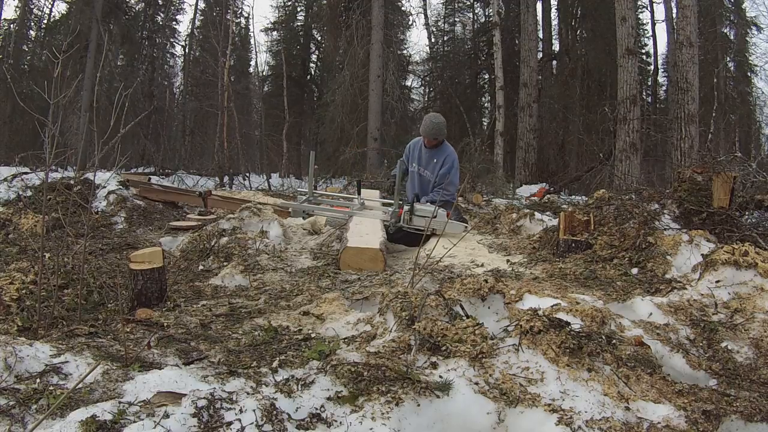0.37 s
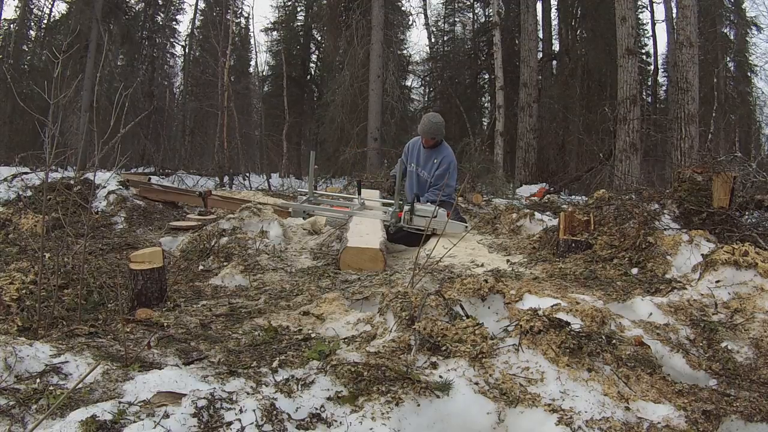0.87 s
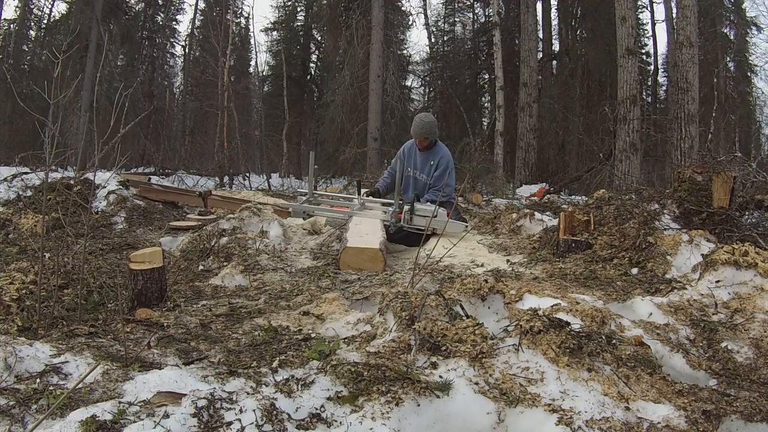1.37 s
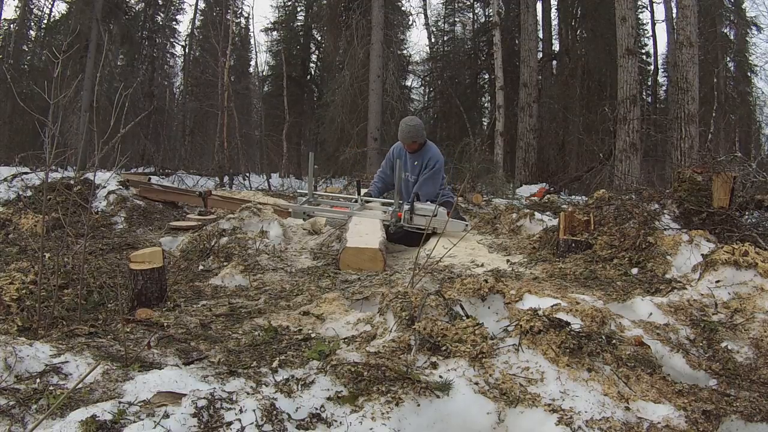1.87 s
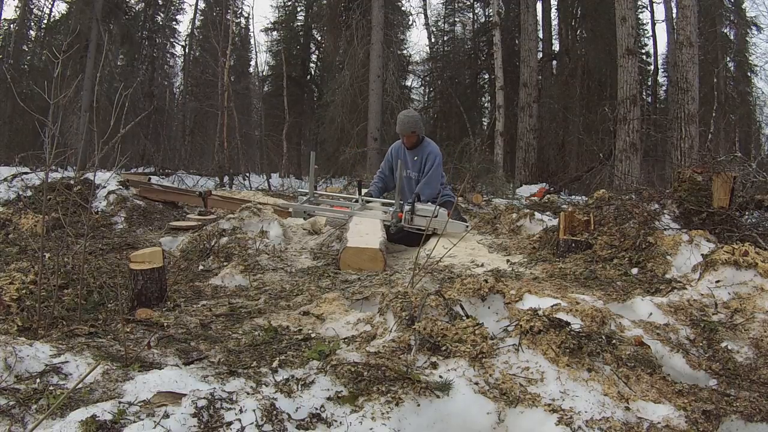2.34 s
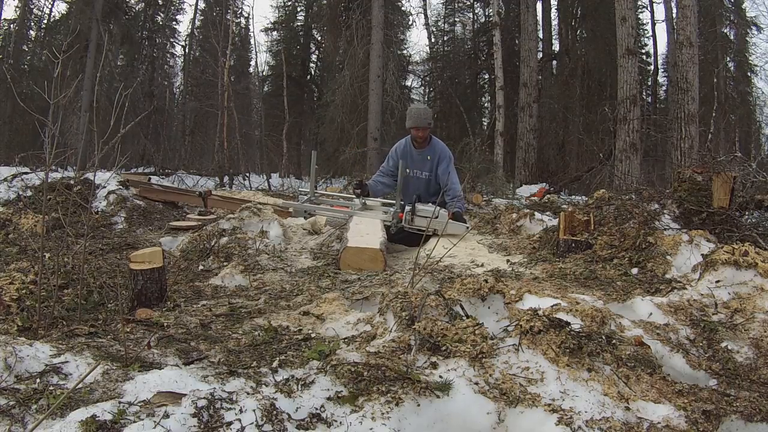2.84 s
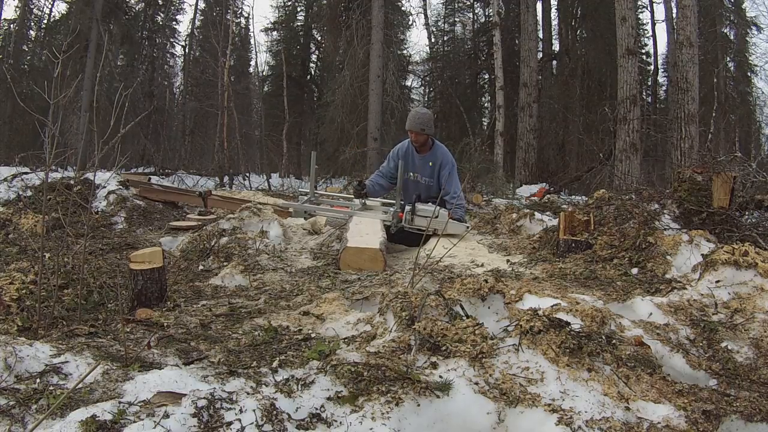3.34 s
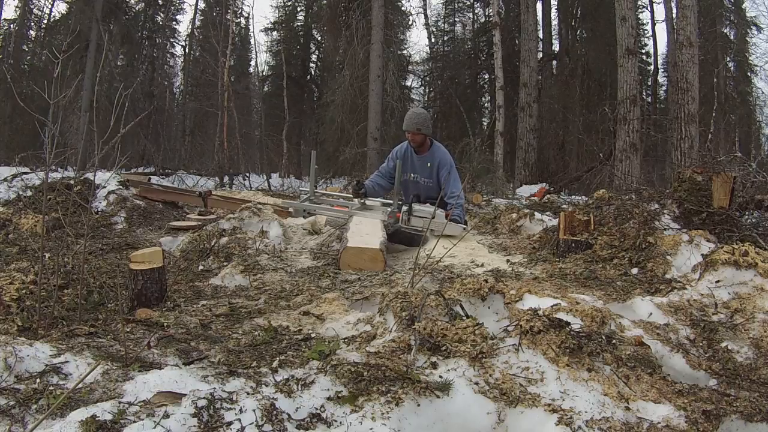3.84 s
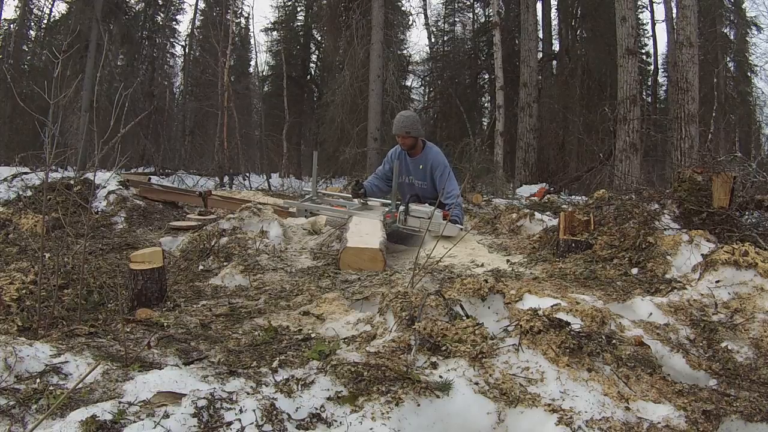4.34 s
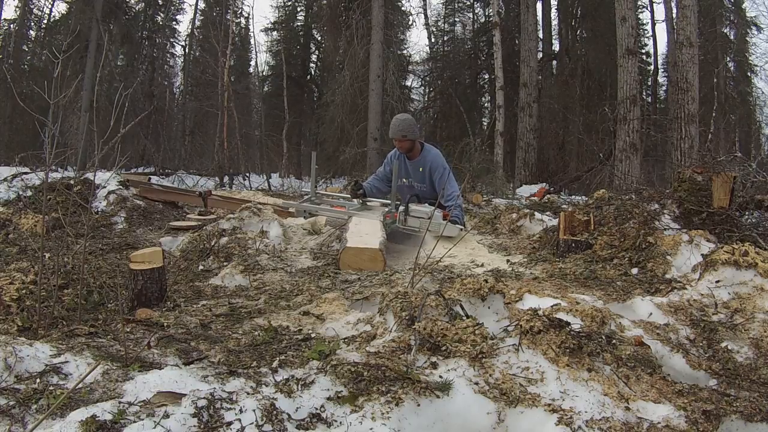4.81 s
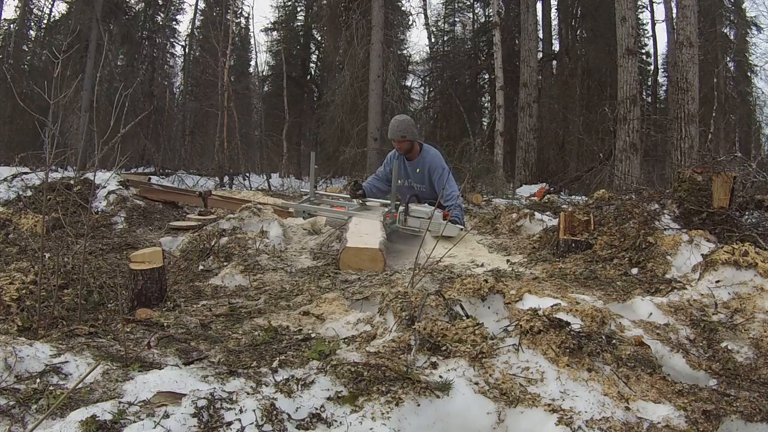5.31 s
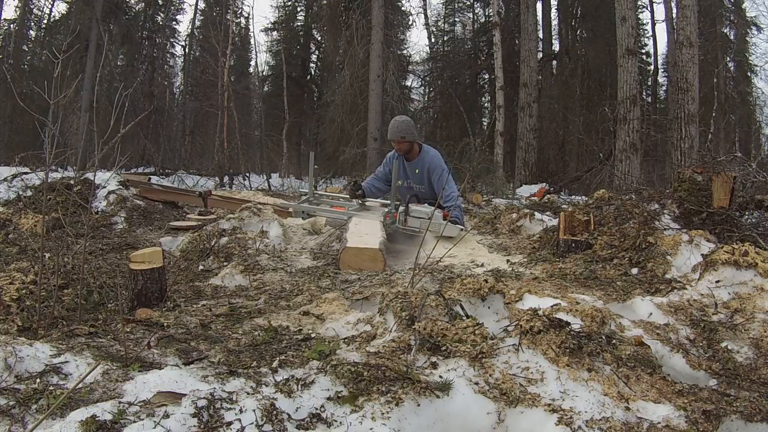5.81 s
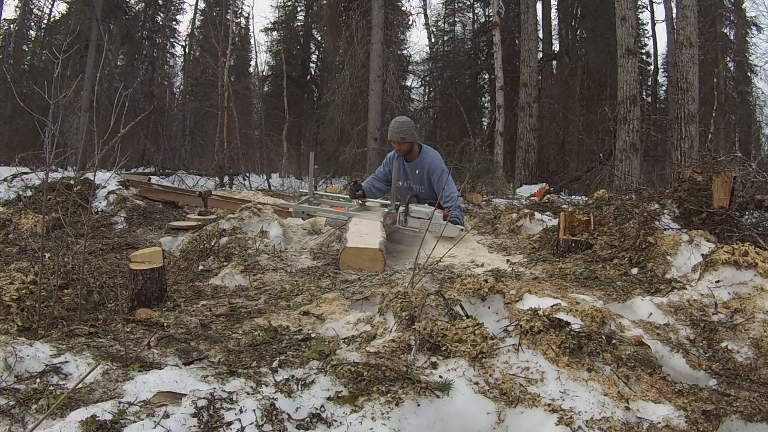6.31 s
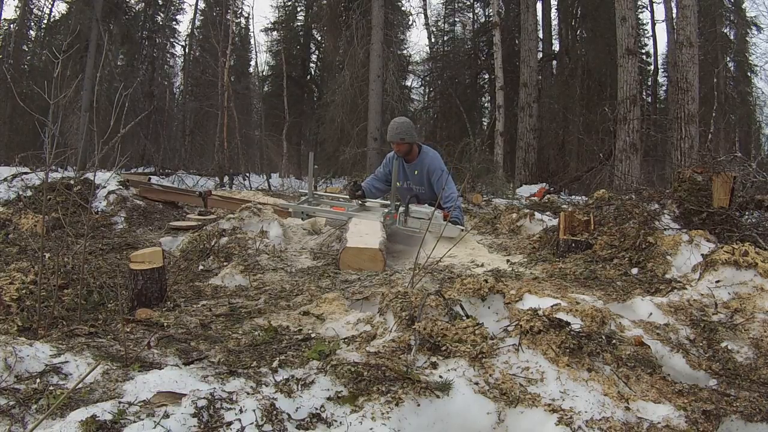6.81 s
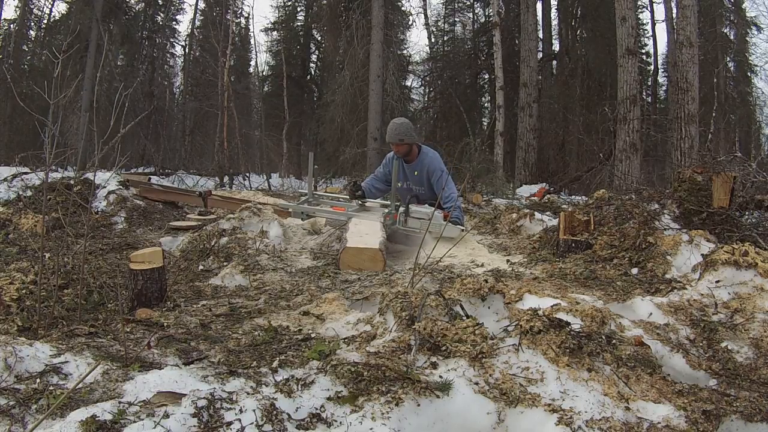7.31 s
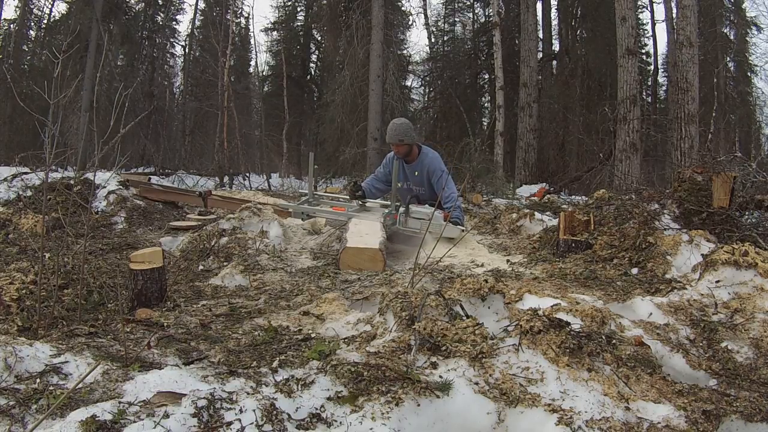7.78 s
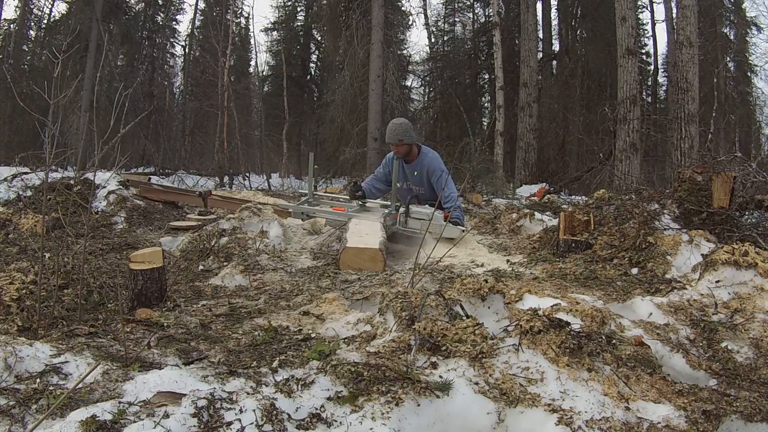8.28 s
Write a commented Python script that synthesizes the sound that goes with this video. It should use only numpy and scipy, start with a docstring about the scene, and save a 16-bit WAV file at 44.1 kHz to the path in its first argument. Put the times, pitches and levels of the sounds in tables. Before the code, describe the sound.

Rough two-stroke chainsaw idle, sputtering and clattering, suddenly throttles up to a harsh buzzing roar cutting wood, pitch slowly dropping under load.

```python
"""A two-stroke chainsaw on a milling frame idles unevenly: a noise crack and puff at each firing, clatter between.
Then it revs up and rips along a log, bogging in the cut: sine orders of the crank, with pulsing roar and hiss.
Place: a snowy wood with dull echoes. Distance: some metres off.
Microphone: in a closed camera housing that thins the middle and rings between 2 and 6 kHz (one filter);
low shaking booms near 60 Hz as noise through slow resonances, over steady still-air and microphone noise."""
import sys
import numpy as np
from scipy import signal
from scipy.fft import rfft, irfft, next_fast_len
from scipy.io import wavfile
from scipy.ndimage import uniform_filter1d

SR = 44100
rng = np.random.default_rng(int(sys.argv[2]) if len(sys.argv) > 2 else 0)


def attenuation_scalar(level_db):
    """Turn a level in dB into a linear amplitude multiplier (20 dB per decade)."""
    decades = np.asarray(level_db, float) / 20
    return 10 ** decades


def persist_wave(psi):
    """Save psi, clipped to +-1, as 16-bit WAV."""
    counts = np.round(np.clip(psi, -1, 1) * 32767).astype(np.int16)
    wavfile.write(sys.argv[1], SR, np.atleast_2d(counts).T)


N = 381906

# Idle firings, the charge lights only every few turns; level ahead of wood and housing: start_s, level_db
FIRINGS = [(0.0327, -26), (0.1124, -22.5), (0.194, -26), (0.2798, -25), (0.3337, -28.5), (0.38, -26.5),
           (0.4658, -24), (0.528, -25.5), (0.613, -24), (0.6677, -28), (0.732, -32), (0.804, -27),
           (0.9094, -26), (0.9705, -28), (1.057, -29), (1.119, -32), (1.2126, -30), (1.277, -28.5),
           (1.368, -27), (1.4283, -29.5), (1.501, -26.5), (1.5671, -24.5), (1.6807, -23), (1.7662, -24),
           (1.825, -26), (1.864, -31), (1.9073, -32), (1.9335, -22), (2.018, -28.5), (2.0822, -26),
           (2.141, -32.5), (2.235, -31), (2.3135, -25.5), (2.3973, -29), (2.5002, -26), (2.589, -25),
           (2.673, -22.5), (2.756, -22.5), (2.8503, -30), (2.959, -26), (3.0422, -23.5), (3.1219, -24.5),
           (3.245, -23.5), (3.3462, -23.5), (3.424, -22), (3.516, -25), (3.544, -20)]
# Clatter of an unfired turn and its thin ting, before turn-to-turn changes: time_s, clatter_db, ting_db
UNFIRED = [(0, -34.5, -36.5), (.75, -30.5, -31.5), (1.0, -31, -45), (2.1, -33, -40), (2.4, -36, -44),
           (2.7, -30, -37), (3.3, -30.5, -38), (3.5, -27, -33)]
# Low hum of the idle, order of the turn rate: order, level_db
IDLE_ORDERS = [(1, -50.5), (2, -66.5), (4, -67)]
# Parts of the casing that a noise puff reaches: low_hz, high_hz
CASING_BANDS = [(1200, 2200), (2200, 3300), (3300, 4500), (4500, 6500), (6500, 9000)]
# Slow modes of the housing, width of one resonance, levels against each other: pitch_hz, width_hz, level_db
BOOM_MODES = [(50.8, 10, -25), (63.85, 5.2, 0), (80.3, 10.7, -0.5)]
# Gusts of low shaking on the housing, level before the boom's band-pass: centre_s, level_db, length_s
GUSTS = [(.1, -48, 0.19), (.4, -48, 0.17), (.62, -49, 0.13), (1.862, -34.5, 0.055), (1.962, -35, 0.032),
         (2.277, -47, 0.087), (2.806, -50, 0.061), (3.45, -38.5, .15), (3.616, -38, 0.15),
         (3.868, -43, 0.11), (4.046, -38.5, 0.11), (4.473, -44, 0.075), (4.95, -42, 0.12), (5.2, -39, 0.28),
         (5.512, -39, .13), (5.835, -41, 0.33), (6.3, -36, 0.12), (6.476, -34, 0.093), (6.628, -32, 0.099),
         (6.872, -28, 0.22), (7.35, -41.5, 0.33), (7.516, -33.5, 0.13), (7.7, -33, .1), (7.82, -33, 0.095),
         (8.046, -41, 0.24), (8.263, -30.5, 0.16), (8.54, -35, .3)]
# Colour of still air and microphone noise, relative density: pitch_hz, level_db_per_hz
MIC_NOISE = [(20, -7), (50, -27), (100, -3), (200, -6.5), (330, -6), (500, -12.5), (780, -13), (1040, -19),
             (2000, -16), (6000, -37), (12000, -30), (14000, -32), (15500, -22)]
# Echoes from ground and trunks: delay_s, level_db
ECHOES = [(.011, -22.5), (.037, -14), (.083, -24.5), (0.138, -16)]
# Broad trend of what passes the housing: pitch_hz, gain_db
HOUSING = [(60, -28), (200, -45.5), (700, -21), (1100, -21), (1700, -16.5), (2400, -5), (3200, -1),
           (4200, -1.5), (5300, -4.5), (6500, -11), (9000, -11), (11200, -10), (13200, -14), (15200, -23.5)]
# Narrow peaks and notches of the housing, added to the trend: pitch_hz, width_hz, gain_db
HOUSING_MODES = [(1000, 102, -10), (1179, 70, -15.5), (1696, 120, 10), (1853, 17, -4.5), (2072, 170, -16.5),
                 (2183, 126, 6), (2403, 61, 9), (2915, 94, 6.5), (3054, 180, 2.5), (3564, 42, 8),
                 (3510, 57, 5), (3640, 76, -6.5), (4140, 120, 4), (4730, 43, 2), (5330, 930, 5),
                 (2685, 90, -8), (4460, 115, -22), (4915, 110, -20), (5680, 200, -4), (7630, 1100, 1),
                 (8460, 340, 5), (9290, 990, -4.5), (11660, 270, -18.5), (12260, 390, -16)]
# Crank speed under throttle: time_s, speed_turns_per_s
THROTTLE = [(3.5, 54.9), (3.57, 74.8), (3.61, 83.1), (3.66, 79.9), (3.73, 103.0), (3.8, 121.4),
            (3.84, 129.3), (4.04, 140.5), (4.26, 187.1), (4.36, 197.9), (4.45, 194.7), (4.62, 179.8),
            (4.83, 179.0), (5.03, 183.6), (5.89, 168.8), (6.15, 158.6), (6.76, 149.8), (6.9, 141.9),
            (7.06, 132.8), (7.26, 129.7), (7.51, 138.4), (7.67, 137.4), (8.03, 127.8), (8.51, 126.2),
            (8.66, 131.7)]
# Intake growl as the throttle opens, before the airbox resonance: time_s, level_db
GROWL = [(3.5, -53), (3.56, -59), (3.68, -59.5), (3.76, -54), (3.82, -83), (3.9, -105)]
# Orders of the turn rate in the growl: order
GROWL_ORDERS = [7, 8, 9, 10, 11]
# Exhaust tones before speed and resonances act, and where exhaust and intake cancel:
# order, level_db, dip_hz, dip_width_hz, dip_db
EXHAUST = [(1, -45.5, 138, 6.7, -17), (2, -50, 279, 15, -4), (3, -55.5, 623, 87, -29),
           (4, -54, 480, 110, -13.5), (5, -62, 725, 136, -15), (6, -54, 1030, 290, -24)]
# Exhaust orders that keep their strength at low speed: order
HELD_ORDERS = [3, 5]
# Load of the cut, ahead of wood and housing: time_s, roar_db, whine_db, hiss_db
LOAD = [(3.53, -29.5, -36, -34), (3.6, -31, -41, -36), (3.76, -22, -30, -22.5), (3.89, -19.5, -27, -18),
        (4.13, -21.5, -22.5, -26), (4.33, -19.5, -18.5, -18.5), (4.71, -19.5, -20.5, -21.5),
        (5.13, -20.5, -20, -20), (5.62, -20.5, -19, -23.5), (5.92, -21, -22, -22), (6.2, -21, -23.5, -22),
        (6.7, -22, -23, -22.5), (7.1, -20.5, -25, -22), (7.49, -20.5, -25, -21.5),
        (7.84, -20.5, -23.5, -21.5), (8.15, -22, -26, -18.5), (8.66, -19.5, -26.5, -24)]
# Wavering exhaust and fan whine, levels against each other: order, level_db
WHINE = [(7, 0), (9, 0.5), (10, -1), (11, -1.5), (13, -0.5), (15, 4.5), (16, 3), (18, 2), (20, 2.5),
         (22, 2.5), (23, 1), (24, -6), (25, 0), (28, 2)]
# Steadier chain and fan orders against the whine level, and where each sings out or fades:
# order, level_db, peak_hz, peak_width_hz, peak_db
FAN = [(8, -15, 1284, 84, 11), (12, -10.5, 1870, 470, -16), (14, -15.5, 2425, 46, 5.5),
       (17, -9, 2984, 190, 3.5), (19, -16, 3460, 49, 9.5), (21, -23, 3270, 330, 13.5)]

CRUISE_TURNS_PER_S = 160
AIRBOX_HZ, AIRBOX_WIDTH_HZ = 720, 280


def rms_one(x):
    """Scale to rms 1."""
    return x / np.sqrt(np.mean(x ** 2) + 1e-20)


def noise():
    """White noise for the whole scene."""
    return rng.standard_normal(N)


def in_time(rows):
    """Columns of a table at every sample."""
    s, *columns = np.transpose(rows)
    return [np.interp(np.arange(N) / SR, s, column) for column in columns]


def drift(rate_hz):
    """Slow chance of spread 1: noise through two equal low-pass poles, run at every 40th sample."""
    r = np.exp(-80 * np.pi * rate_hz / SR)
    slow = signal.lfilter([1], [1, -2 * r, r * r], rng.standard_normal(N // 40 + 2002))[2000:]
    return np.interp(np.arange(N) / 40, np.arange(len(slow)), rms_one(slow))


def hump(hz, mode_hz, width_hz):
    """Shape of a resonance, 1 on top."""
    return 1 / (1 + (2 * (hz - mode_hz) / width_hz) ** 2)


def colour(x, trend, modes=()):
    """Causal (minimum-phase) filter with the given trend, peaks and notches."""
    size = next_fast_len(N + SR // 4, True)
    hz = np.maximum(np.arange(size // 2 + 1) * SR / size, 1)
    trend_hz, trend_db = np.transpose(trend)
    db = np.interp(np.log(hz), np.log(trend_hz), trend_db)
    for mode_hz, width_hz, mode_db in modes:
        db = db + mode_db * hump(hz, mode_hz, width_hz)
    # folding the cepstrum forward in time makes the phase minimal
    cepstrum = irfft(db * np.log(10) / 20, size)
    cepstrum[1:size // 2] *= 2
    cepstrum[size // 2 + 1:] = 0
    return irfft(rfft(x, size) * np.exp(rfft(cepstrum)), size)[:N]


def band(x, low_hz, high_hz):
    """Band-pass."""
    return signal.sosfilt(signal.butter(2, [low_hz, high_hz], "band", fs=SR, output="sos"), x)


def dulled(x, corner_hz):
    """Gentle first-order low-pass."""
    return signal.sosfilt(signal.butter(1, corner_hz, fs=SR, output="sos"), x)


def bursts(at_s, db, rise_s, fall_s):
    """Envelope of puffs, each of peak height given in dB."""
    marks = np.full(N, 1e-18)
    places = np.clip(np.round(at_s * SR).astype(int), 0, N - 1)
    np.add.at(marks, places, attenuation_scalar(db))
    t = np.arange(SR // 20) / SR
    shape = (1 - np.exp(-t / rise_s)) * np.exp(-t / fall_s)
    return signal.oaconvolve(marks, shape / shape.max())[:N]


def ticks(at_s, db, tilt_db, spread_db, rise_s, fall_s):
    """Noise puffs that reach each part of the casing with a strength of their own."""
    strengths_db = spread_db * rng.standard_normal((len(at_s), len(CASING_BANDS)))
    white = [noise(), noise()]   # neighbouring parts get unrelated noise
    out = 0
    for k, (low_hz, high_hz) in enumerate(CASING_BANDS):
        envelope = bursts(at_s, db + tilt_db * k + strengths_db[:, k], rise_s, fall_s)
        out = out + envelope * band(white[k % 2], low_hz, high_hz)
    return out


def firings():
    """Each firing gives a sharp crack, a treble snap and the slower blowdown of the exhaust."""
    fired, fired_db = np.transpose(FIRINGS)
    snap_db = fired_db - 8.5 + 2.0 * rng.standard_normal(len(fired))
    crack = bursts(fired - .0008, fired_db + 2.5, .0004, .0018) * band(noise(), 3400, 6300)
    snap = bursts(fired - .001, snap_db, 0.00089, 0.0024) * band(noise(), 8600, 19000)
    blowdown = ticks(fired - .007, fired_db - 10.0, tilt_db=0.073, spread_db=1.0,
                     rise_s=0.008, fall_s=0.0096)
    return crack + snap + blowdown


def idle_turns():
    """Times of the unfired turns and their place after the firing: the crank coasts, each turn slower."""
    turns_per_s = 48.0   # sets how many whole turns fit between firings
    fired = np.transpose(FIRINGS)[0]
    edges = np.r_[fired[0] - .083, fired]
    turns, places = [], []
    for start, end in zip(edges, edges[1:]):
        count = max(round((end - start) * turns_per_s), 1)
        turns += list(start + (end - start) * (np.arange(1, count) / count) ** 1.091)
        places += list(range(1, count))
    return np.array(turns), np.array(places)


def unfired_turns():
    """Each unfired turn clatters softly with a thin ting, weaker the longer the crank coasts."""
    turns, places = idle_turns()
    s, clatter_db, ting_db = np.transpose(UNFIRED)
    uneven_db = 1.5 * rng.standard_normal(len(turns)) - 0.37 * places
    clatter = ticks(turns - .004, np.interp(turns, s, clatter_db) + uneven_db, tilt_db=-1.3,
                    spread_db=1.8, rise_s=0.00086, fall_s=0.0049)
    ting = bursts(turns - .003, np.interp(turns, s, ting_db) + uneven_db, 0.00067, 0.0064)
    return clatter + ting * band(noise(), 8050, 10360)


def idling():
    """The idle gives way to the open throttle."""
    return np.interp(np.arange(N) / SR, [3.5, 3.62], [1, 0])


def rattle():
    """Steady faint band of noise under the idle."""
    return attenuation_scalar(-45.5) * idling() * band(noise(), 1600, 5500)


def idle_hum():
    """Each turn, fired or not, pumps the crankcase: a low hum on the mean turn rate."""
    every = np.sort(np.r_[idle_turns()[0], np.transpose(FIRINGS)[0]])
    every = np.r_[every[0] - .2, every, every[-1] + .2]
    counted = np.r_[-10, np.arange(len(every) - 2), len(every) + 10]
    turned = np.interp(np.arange(N) / SR, every, counted)
    angle = 2 * np.pi * uniform_filter1d(turned, size=7000, mode="nearest")
    hum = sum(attenuation_scalar(db + order * 0.6 * drift(1.5)) * np.sin(order * angle) for order, db in IDLE_ORDERS)
    return idling() * hum


def gust_strength():
    """Powers of the gusts add up over a faint lull, which rises a little as the cut begins."""
    t = np.arange(0, N + 200, 200) / SR
    power = attenuation_scalar(2 * np.interp(t, [3.4, 3.6], [-51, -48.5]))
    for s, db, length_s in GUSTS:
        power = power + attenuation_scalar(2 * db) * np.exp(-(2 * (t - s) / length_s) ** 2)
    return np.interp(np.arange(N) / SR, t, np.sqrt(power))


def boom():
    """Low shaking sets the housing's slowest modes going at random; a double resonance keeps them narrow."""
    rung = 0
    for hz, width_hz, db in BOOM_MODES:
        r = np.exp(-np.pi * width_hz / SR)
        poles = [1, -2 * r * np.cos(2 * np.pi * hz / SR), r * r]
        once = signal.lfilter([1, 0, -1], poles, rng.standard_normal(N + SR))
        twice = signal.lfilter([1], poles, once)[SR:]   # the first second lets the mode build up
        rung = rung + attenuation_scalar(db) * rms_one(twice)
    rung = rms_one(rung)
    swell = np.sqrt(uniform_filter1d(rung ** 2, size=3500) + 1e-12)
    evened = rung / swell ** 0.97   # most of its own chance swell is taken out
    gusts = gust_strength()
    rush = attenuation_scalar(-24.5) * rms_one(band(noise(), 170, 240))   # the gusts also rush above the boom
    return band(band(gusts * evened, 26.0, 78), 20, 70) + uniform_filter1d(gusts, size=20000) * rush


def still_air():
    """Still air and microphone noise: coloured noise at a steady -59.5 dB rms."""
    return attenuation_scalar(-59.5) * rms_one(colour(noise(), MIC_NOISE))


def wood(x):
    """A few dull echoes from ground and trunks."""
    dull = dulled(x, 5000)
    return x + sum(attenuation_scalar(db) * np.r_[np.zeros(round(s * SR)), dull][:N] for s, db in ECHOES)


def housing(x):
    """The closed housing thins the middle and rings at narrow modes."""
    return colour(x, HOUSING, HOUSING_MODES)


def opened():
    """The throttle opens."""
    return np.interp(np.arange(N) / SR, [3.49, 3.58], [0, 1])


def crank():
    """Crank angle in radians, wavering a little from turn to turn."""
    speed = uniform_filter1d(in_time(THROTTLE)[0], size=2000)
    return 2 * np.pi * np.cumsum(speed * (1 + 0.001 * drift(24.7))) / SR


def intake_growl(angle):
    """While the speed is still low the intake growls: crank orders ring as they pass the airbox."""
    speed, = in_time(THROTTLE)
    growl = 0
    for order in GROWL_ORDERS:
        ring = hump(order * speed, AIRBOX_HZ, AIRBOX_WIDTH_HZ) ** 0.99
        growl = growl + np.sin(order * angle + .7 * order ** 2) * ring
    return np.sqrt(2) * opened() * attenuation_scalar(in_time(GROWL)[0]) * growl


def exhaust_tones(angle):
    """The low orders stand as clean tones whose level follows their pitch."""
    speed, = in_time(THROTTLE)
    speed_db = -1.0 * np.log2(speed / CRUISE_TURNS_PER_S)
    # below the speed the exhaust is tuned for, most orders fall away by 12.5 dB per octave
    fall_db = 12.5 * np.minimum(np.log2(speed / 131), 0)
    tones = 0
    for order, db, dip_hz, dip_width_hz, dip_db in EXHAUST:
        hz = order * speed
        db = db + speed_db + dip_db * hump(hz, dip_hz, dip_width_hz)
        db = db + 6.5 * hump(hz, AIRBOX_HZ, AIRBOX_WIDTH_HZ)
        db = db + 16 * hump(hz, 80, 36)   # swells on sweeping through the housing's boom
        if order not in HELD_ORDERS:
            db = db + fall_db
        level = uniform_filter1d(attenuation_scalar(db), size=1500) * attenuation_scalar(0.84 * drift(8.2))
        tones = tones + level * np.sin(order * (angle + 0.093))
    return np.sqrt(2) * opened() * tones


def whine(angle):
    """Exhaust and fan whine on the crank orders, each wavering alone."""
    speed, = in_time(THROTTLE)
    level_db = -15 + 1 * np.log2(speed / CRUISE_TURNS_PER_S)   # rises 1 dB per octave of speed
    orders = 0
    for order, db in WHINE:
        start = rng.uniform(0, 2 * np.pi)
        orders = orders + attenuation_scalar(db + 1.8 * drift(2.0)) * np.sin(order * angle + start)
    return attenuation_scalar(level_db) * dulled(orders, 3800)   # the muffler dulls the top orders


def fan(angle):
    """Steadier orders of chain and fan, which sing out or fade as they pass a resonance."""
    speed, = in_time(THROTTLE)
    out = 0
    for order, db, peak_hz, width_hz, peak_db in FAN:
        db = db + peak_db * hump(order * speed, peak_hz, width_hz) + 0.97 * drift(2.9)
        out = out + attenuation_scalar(db) * np.sin(order * angle)
    return out


def engine(angle):
    """Whine and fan follow the load of the cut; noise bands of roar and chain hiss pulse once a turn."""
    roar_db, whine_db, hiss_db = in_time(LOAD)
    speed, = in_time(THROTTLE)
    depth_db = 0.38 * (CRUISE_TURNS_PER_S / speed) ** 3.7   # single firings stand out at low speed
    pulse = attenuation_scalar(depth_db * np.cos(angle + 1.46) + 0.46 * drift(34))
    roar = pulse * band(noise(), 88, 7300)
    hiss = pulse * attenuation_scalar(.3 * drift(6)) * band(noise(), 5000, 18000)
    tonal = attenuation_scalar(whine_db) * (whine(angle) + fan(angle))
    return opened() * (tonal + attenuation_scalar(roar_db) * roar + attenuation_scalar(hiss_db) * hiss)


def scene():
    """Saw through wood and housing; low tones, hum, boom and still air join directly."""
    idle = firings() + unfired_turns() + rattle()
    angle = crank()
    saw = housing(wood(idle + engine(angle)))
    low_tones = exhaust_tones(angle) + intake_growl(angle) + idle_hum()
    return (saw + low_tones + boom() + still_air())[None]


def roll_off(x):
    """The treble ends steeply here."""
    return signal.sosfilt(signal.butter(12, 15240, fs=SR, output="sos"), x)


def record(dry):
    """The top is cut steeply, 50 dB down from 15450 Hz."""
    steep = signal.cheby2(12, 50, 15450, fs=SR, output="sos")
    mix = signal.sosfilt(steep, dry)
    return roll_off(mix)


dry = scene()
out = record(dry)
persist_wave(out)
```